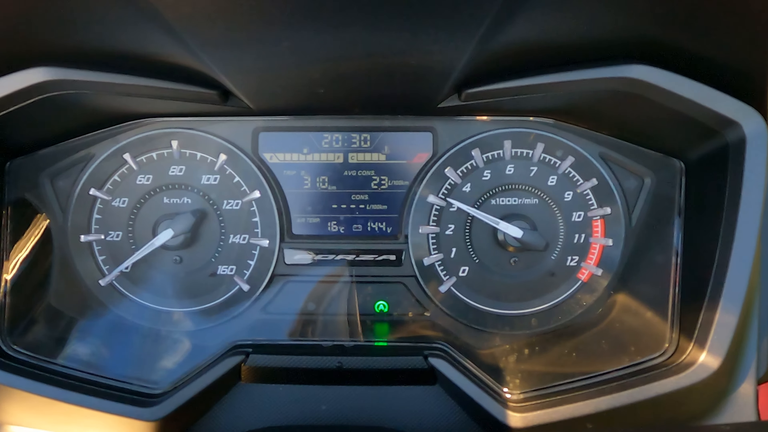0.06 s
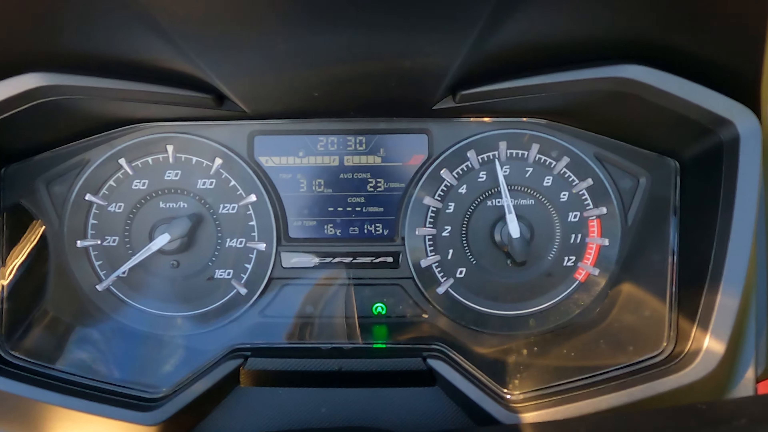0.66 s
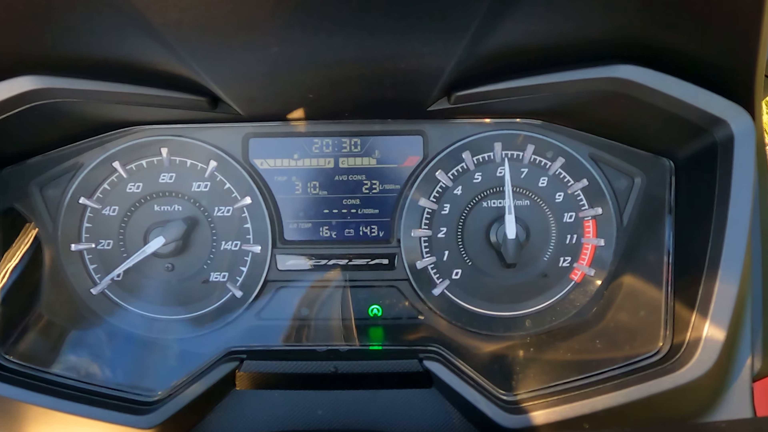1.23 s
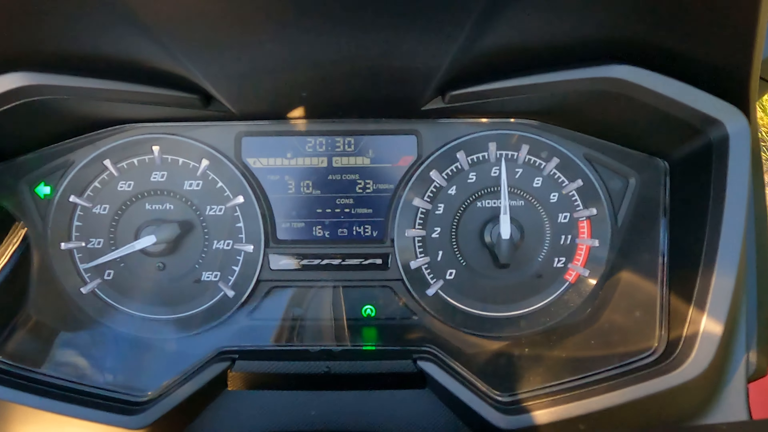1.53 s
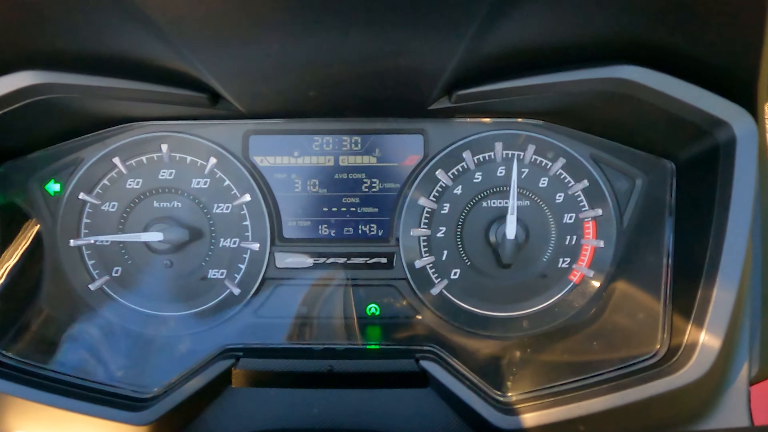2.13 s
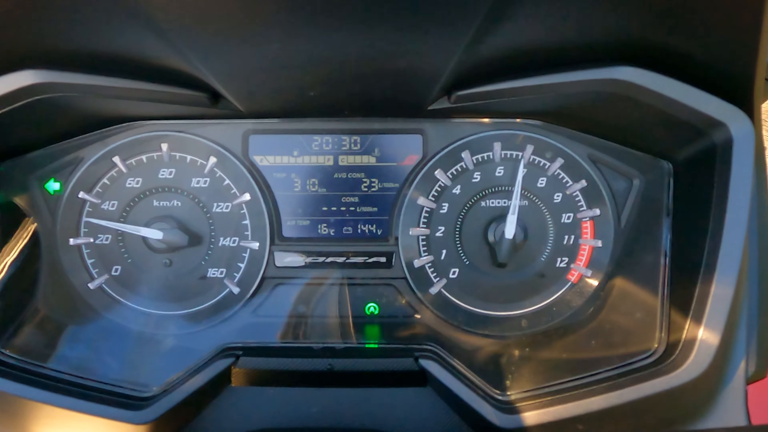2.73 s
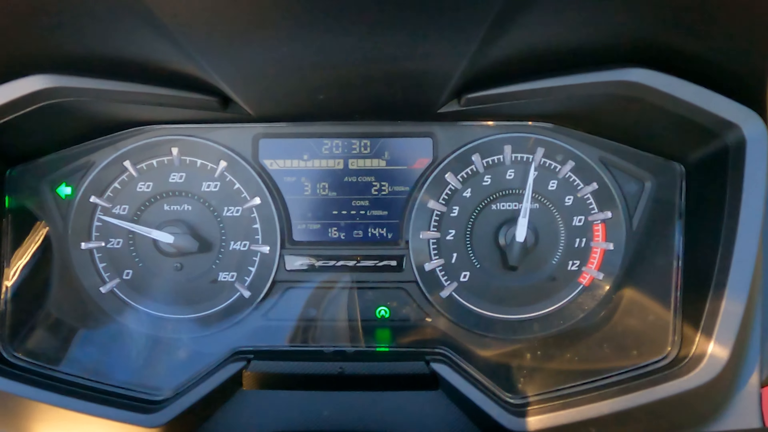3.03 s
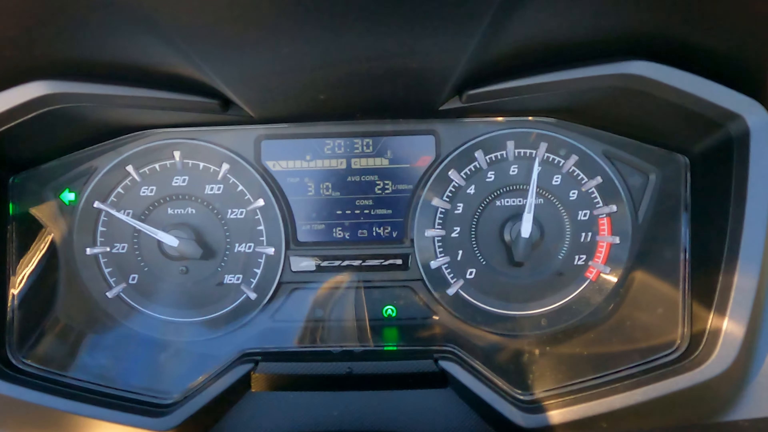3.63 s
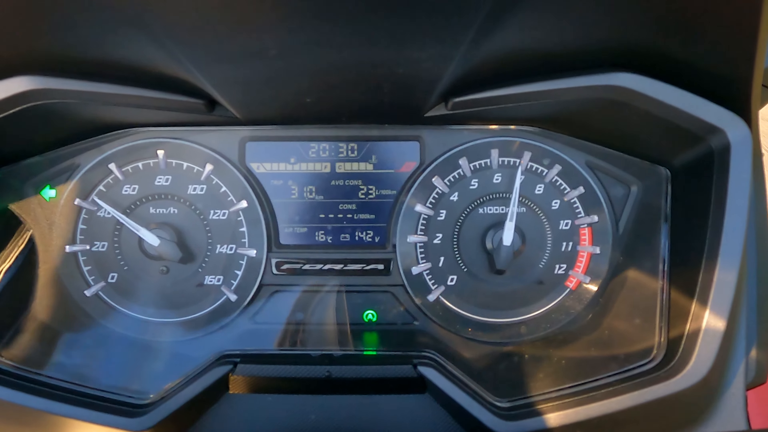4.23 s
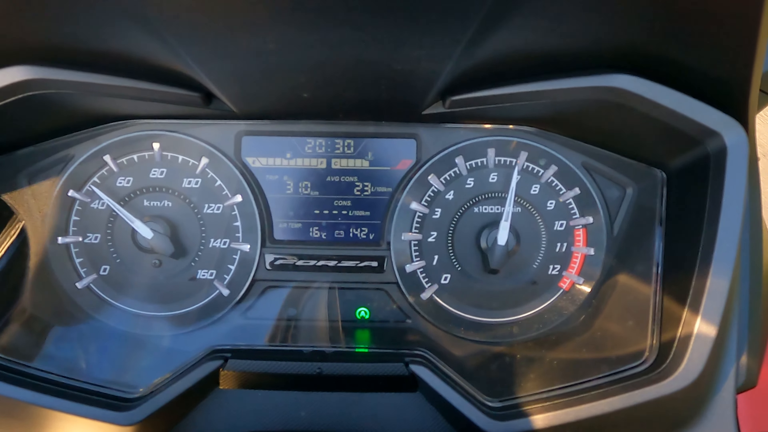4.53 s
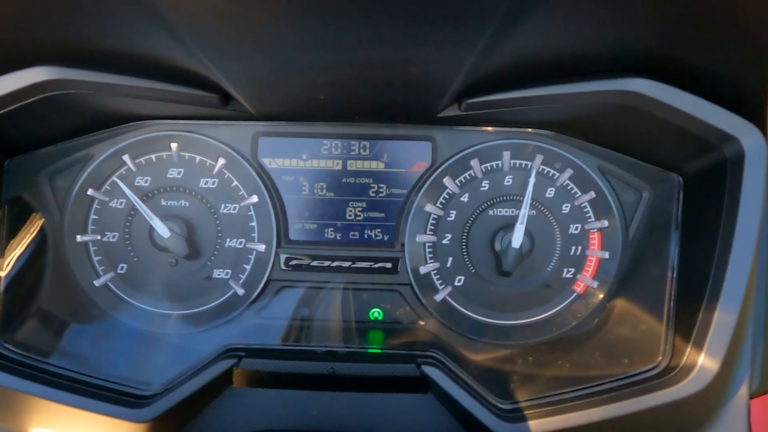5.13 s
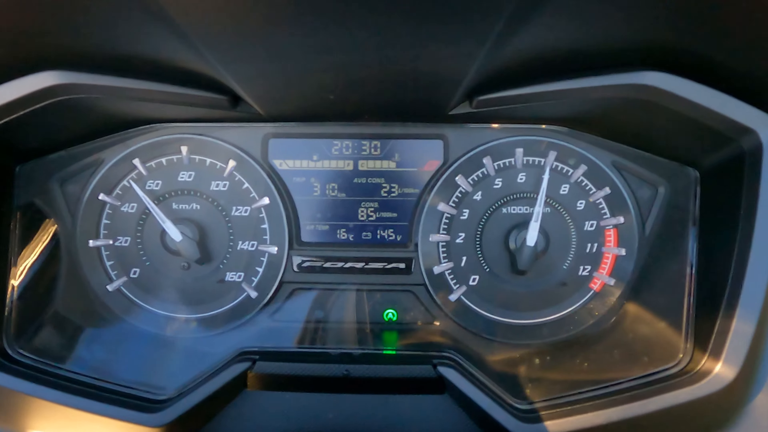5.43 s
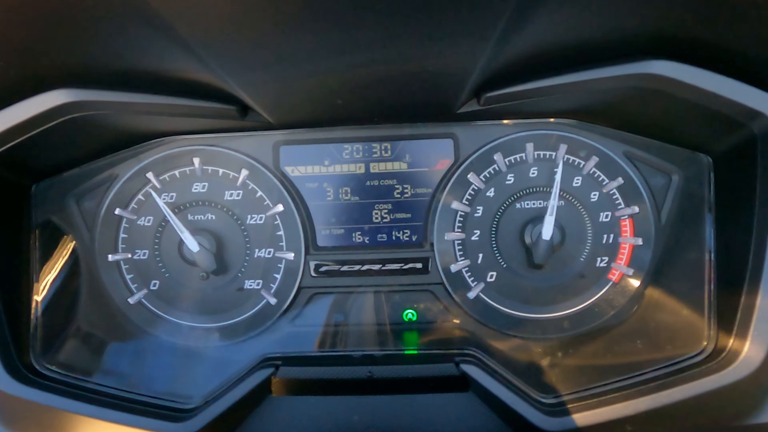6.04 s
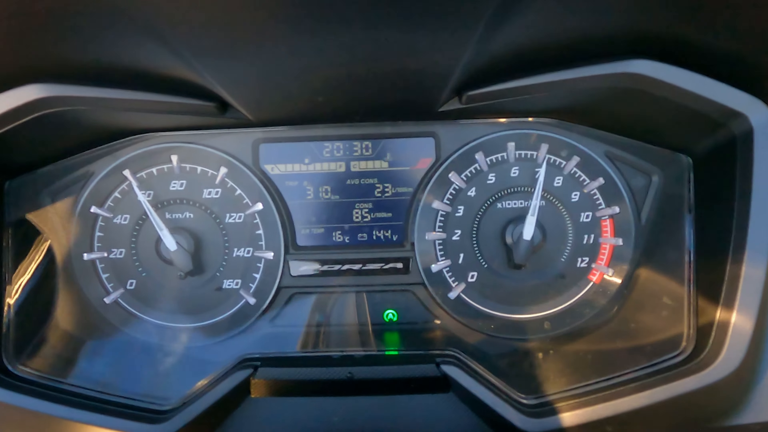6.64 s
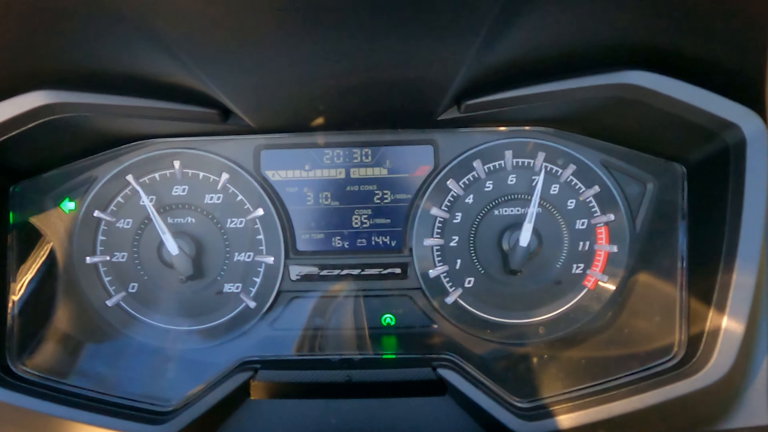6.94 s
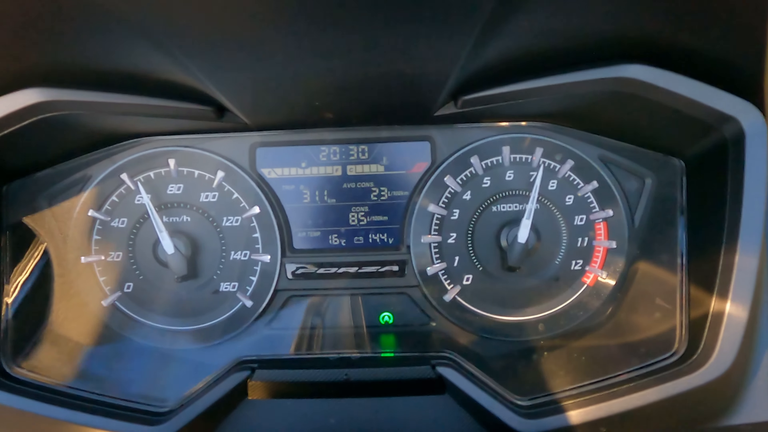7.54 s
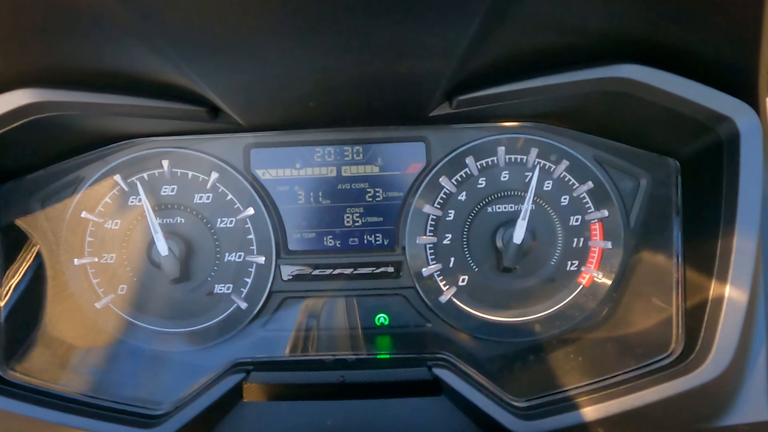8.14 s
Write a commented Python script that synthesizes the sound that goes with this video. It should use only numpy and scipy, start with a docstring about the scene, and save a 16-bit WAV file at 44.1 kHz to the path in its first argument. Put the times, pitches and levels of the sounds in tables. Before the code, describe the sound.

A single-cylinder scooter is heard close up from behind its windscreen. It starts at a low, uneven idle, and at about 0.2 seconds the throttle opens and the revs jump, climbing quickly through the first second. The exhaust booms and the intake hums over mechanical clatter, a light gear whine and a faint hiss. The indicator switch makes two small plastic clicks at about 1.5 and 1.7 seconds. By 2.5 seconds the engine settles into a strong, steady drone that creeps only slightly higher until the end. Tyre noise grows gradually underneath as speed builds. Low wind rumble swells from around 3 seconds, and from 4 seconds irregular gusts buffet the microphone. Short, hard slaps of wind come around 5, from 5.8 to 6.4, near 7 and from 7.8 seconds on. Engine and wind are still going at the end, near 8.4 seconds.

```python
"""A single-cylinder scooter pulls away at full throttle, heard from behind its windscreen.
The revs climb until the variable belt drive holds them. Periodic gas pulses make the exhaust boom
and the intake honk; impacts and meshing teeth drive the casing's resonances into clatter and whine.
The indicator switch clicks in and out. With road speed the tyres roar, and turbulent wind buffets
and slaps the microphone more and more."""
import sys
import numpy as np
from scipy import signal
from scipy.fft import rfft, irfft, next_fast_len
from scipy.io import wavfile
from scipy.ndimage import uniform_filter1d

SR = 44100
rng = np.random.default_rng(int(sys.argv[2]) if len(sys.argv) > 2 else 0)


def int16_out(signal):
    """Quantize to a 16-bit WAV file."""
    q = np.round(np.clip(np.atleast_2d(signal).T, -1, 1) * 32767)
    wavfile.write(sys.argv[1], SR, q.astype(np.int16))


N = 369558
TIME = np.arange(N) / SR


def undb(db):
    """Amplitude ratio of a level in decibels."""
    return 10 ** (np.asarray(db) / 20)


def curves(rows):
    """Linear interpolation of each column after the first (time) to a value per sample."""
    times, *columns = np.transpose(rows)
    return [np.interp(TIME, times, column) for column in columns]


def unit(x):
    """Normalisation to rms 1."""
    return x / np.sqrt(np.mean(x ** 2))


def colour(x, points):
    """Spectral shaping by (Hz, dB) points joined on a logarithmic frequency axis."""
    hz, db = np.transpose(points)
    size = 2 * next_fast_len(len(x) // 2 + 1)
    bins_hz = np.fft.rfftfreq(size, 1 / SR)
    gain = undb(np.interp(np.log(bins_hz + 1), np.log(hz), db, left=-70, right=-70))
    return irfft(rfft(x, size) * gain)[:len(x)]


def noise(points):
    """Spectrally shaped Gaussian noise of rms 1."""
    return unit(colour(rng.standard_normal(N), points))


def walk(rate):
    """Random modulation: values held 1 / rate seconds and smoothed twice; spread near 1."""
    hold = max(int(SR / rate), 2)
    held = np.repeat(rng.standard_normal(N // hold + 1), hold)
    return 1.3 * uniform_filter1d(uniform_filter1d(held, hold), hold)[:N]


def ring(x, hz, width):
    """A second-order resonator with gain 1 at its centre and a bandwidth in Hz."""
    return signal.lfilter(*signal.iirpeak(hz, hz / width, SR), x)


def step(at_s, rise_s):
    """A logistic rise from 0 to 1, halfway at at_s."""
    return (1 + np.tanh((TIME - at_s) / (2 * rise_s))) / 2


def with_revs(hz, held_db, doubling_db, held_hz=57):
    """A power law: the level in dB grows evenly per doubling of the firing rate."""
    return held_db + doubling_db * np.log2(hz / held_hz)


def per_firing(cycle):
    """Cycle-to-cycle variation: one random value per firing, linearly joined."""
    return np.interp(cycle, np.arange(1024), rng.standard_normal(1024))


def gas_pulses(cycle, harmonics, rough):
    """Fourier series of a push then a suck; each burn differs in strength and timing."""
    jittered = cycle + 0.039 * rough * per_firing(cycle)
    wave = sum(-undb(db) * np.sin(2 * np.pi * order * jittered) for order, db in harmonics)
    return np.sqrt(2) * wave * (1 + rough * per_firing(cycle))


def throttle(shut_db=-11.5):
    """Gas flow sets amplitude: the gain of exhaust and intake rises to 1 as the plate opens."""
    shut = undb(shut_db)
    return shut + (1 - shut) * step(at_s=0.16, rise_s=0.06)


def stumble(hz, smooth_hz=49):
    """Uneven combustion adds roughness at low revs."""
    return 0.52 * np.clip((smooth_hz - hz) / 10, 0, 1)


# Exhaust boom and pipe drone. Each row: multiple of the firing rate, relative level in dB.
BOOM_HARMONICS = [(1, -4), (2, 1.5), (3, -8.5)]
DRONE_HARMONICS = [(4, 1), (7, -17), (11, -17.5)]
# Pipe resonances. Each row: frequency of the drone's lowest harmonic in Hz, gain of the drone in dB.
PIPE_RESPONSE = [(140, -35.5), (190, -32.5), (203, -36), (207, -62), (211, -53), (221, -27.5), (226, -27.5),
                 (240, -35.5)]


def exhaust(cycle, hz, lag_cycles=.17):
    """Forced vibration: gas pulses boom, and the pipe drones as the revs sweep its resonances."""
    uneven = stumble(hz)
    boom_db = with_revs(hz, held_db=-23.5, doubling_db=7)
    drone_db = np.interp(DRONE_HARMONICS[0][0] * hz, *np.transpose(PIPE_RESPONSE))
    boom = gas_pulses(cycle, BOOM_HARMONICS, rough=0.015 + uneven / 2)
    drone = gas_pulses(cycle - lag_cycles, DRONE_HARMONICS, rough=0.18 + uneven)
    return undb(boom_db) * boom + undb(drone_db) * drone


# Airbox hum and intake honk. Each row: multiple of the firing rate, relative level in dB.
HUM_HARMONICS = [(5, -1.5), (10, -14.5)]
HONK_HARMONICS = [(6, 3), (7, -7), (8, -10), (9, -11.5), (10, -14.5)]
# Airbox resonances. Each row: frequency of the hum's lowest harmonic in Hz, gain of the hum in dB.
AIRBOX_RESPONSE = [(130, -42), (232, -35.5), (249, -53), (254, -25.5), (260, -25.5), (265, -31.5),
                   (285, -32.5), (300, -64)]
# The honk fades for a while as the revs level off. Each row: time in seconds, gain in dB.
HONK_ENVELOPE = [(0, -35.5), (1.05, -29.5), (1.3, -33), (2.8, -33.5), (3.25, -45.5), (4.1, -44),
                 (4.95, -34.5), (7.2, -32), (8.38, -34.5)]
# The intake tract filters the honk. Each row: frequency in Hz, gain in dB.
INTAKE_TRACT = [(120, -5), (260, 2), (340, -1), (368, -8), (393, 5.5), (450, 6), (520, -4.5), (700, -16)]


def intake(cycle, hz, hum_lag_cycles=.14, honk_lag_cycles=.27, gasp_db=-13):
    """Cavity resonance: pulsed suction makes the airbox hum and the intake tract honk."""
    uneven = stumble(hz)
    hum_gain = undb(np.interp(HUM_HARMONICS[0][0] * hz, *np.transpose(AIRBOX_RESPONSE)))
    honk_gain = undb(curves(HONK_ENVELOPE)[0])
    hum = gas_pulses(cycle - hum_lag_cycles, HUM_HARMONICS, rough=0.17 + uneven)
    honk = gas_pulses(cycle - honk_lag_cycles, HONK_HARMONICS, rough=0.15 + uneven)
    # each gulp of air also rings the airbox with noise
    gulps = (1 + 0.75 * np.cos(2 * np.pi * (cycle - .325))) * rng.standard_normal(N)
    gasp = unit(ring(ring(gulps, hz=290, width=104), hz=235, width=220))
    gasp_gain = undb(gasp_db) * (honk_gain + hum_gain / 2) * (1 + 5 * uneven)
    return hum_gain * hum + honk_gain * colour(honk, INTAKE_TRACT) + gasp_gain * gasp


def knocks(cycle, count, scatter):
    """Periodic impacts: valves, piston and chain strike at fixed crank angles with varying force."""
    hits = np.zeros(N)
    firings = np.arange(int(cycle[-1]))
    for angle in (np.arange(count) + rng.random(count)) / count:
        at = np.searchsorted(cycle, firings + angle)
        hits[at] += rng.choice([-1, 1]) * (1 + scatter * rng.standard_normal(len(at)))
    return hits


def throb(cycle, depth=0.082):
    """Amplitude modulation at the firing rate."""
    return 1 + depth * np.cos(2 * np.pi * cycle)


# Panels that the engine shakes. Each row: resonance in Hz, bandwidth in Hz, gain in dB.
PANEL_MODES = [(606, 121, 12), (937, 150, 1.5), (1268, 200, 2), (1527, 123, -4.5), (1713, 120, 1)]
# Casing noise. Each row: frequency in Hz, relative spectral density in dB.
CASING_SPECTRUM = [(150, 14), (280, -7.5), (420, 4), (560, -2.5), (740, -2.5), (920, 2.5), (1150, -0.5),
                   (1500, -3.5), (1750, -5.5), (1900, -14.5), (2300, -32), (4000, -60)]


def casing_clatter(cycle, knock_db=-5):
    """Impact excitation: knocks ring the panel modes over throbbing casing noise."""
    blows = knocks(cycle, count=16, scatter=0.2)
    panels = sum(undb(db) * ring(ring(blows, hz, width), hz, 2 * width) for hz, width, db in PANEL_MODES)
    return throb(cycle) * noise(CASING_SPECTRUM) + undb(knock_db) * unit(panels)


# Gear and cam chain tones. Each row: multiple of the firing rate, casing resonance in Hz,
# its bandwidth in Hz, relative level at resonance in dB.
MESH_TONES = [(15, 850, 30, -17), (18, 1030, 100, -9), (22, 1246, 40, -17), (27, 1530, 30, -17),
              (29, 1738, 50, -11), (30, 1700, 40, -16), (33, 1730, 70, -11.5), (34, 1700, 160, -13),
              (42, 2510, 30, -22), (48, 2505, 50, -25), (49, 2490, 30, -22), (48, 2869, 50, -23),
              (53, 3005, 60, -31), (65, 3310, 40, -24), (69, 3595, 50, -23)]


def gear_whine(cycle, hz, flutter_db=2.5):
    """Resonance swells each meshing tone as the revs carry it past; backlash makes it flutter."""
    whine = np.zeros(N)
    for order, centre, width, db in MESH_TONES:
        detuning = 2 * (order * hz - centre) / width
        flutter = undb(flutter_db * walk(10)) * (1 + .3 * per_firing(cycle))
        tone = np.sin(2 * np.pi * order * cycle + .3 * walk(14))
        whine += undb(db) * flutter / np.hypot(1, detuning) * tone
    return whine


# Chain rasp and air hiss. Each row: frequency in Hz, relative spectral density in dB.
RASP_SPECTRUM = [(1500, -31), (2100, 1), (2550, 0), (3150, -2), (3370, -4.5), (3650, -1), (4150, -4.5),
                 (4600, -9), (5200, -9), (5900, -10), (6500, -14.5), (8000, -33)]
HISS_SPECTRUM = [(4500, -25), (6800, -3.5), (7700, 0.5), (8500, 0), (10000, -1.5), (12000, -4.5),
                 (15800, -8)]


def rasp_and_hiss(cycle, hz, chain_db=-4, noise_db=-3.5, clutch_db=4.5, sway_db=.5):
    """Broadband noise from dense chain impacts and airflow; both rise as the clutch starts the belt."""
    chain = unit(colour(knocks(cycle, count=70, scatter=0.74), RASP_SPECTRUM))
    rasp = undb(chain_db) * chain + undb(noise_db) * noise(RASP_SPECTRUM)
    rasp *= undb(with_revs(hz, held_db=-49.5, doubling_db=6.5))
    hiss = throb(cycle) * noise(HISS_SPECTRUM)
    hiss *= undb(with_revs(hz, held_db=-55, doubling_db=6.5))
    belt_db = clutch_db * (step(at_s=0.45, rise_s=.06) - 1)
    # moving air between engine and microphone makes the treble sway
    return undb(belt_db + sway_db * walk(20)) * (rasp + hiss)


# Air whistling past the throttle plate. Each row: time in seconds, pitch in Hz, level in dB.
WHISTLE_GLIDE = [(0, 9200, -87), (.125, 10900, -66), (.15, 10200, -61), (.18, 8300, -72), (.8, 8360, -62),
                 (1.3, 8450, -66), (3.7, 8630, -59), (4.4, 8370, -73), (8.38, 8050, -78)]


def throttle_whistle(width_hz=1400):
    """An edge tone: a narrow band of noise that slides as the plate opens."""
    hz, db = curves(WHISTLE_GLIDE)
    phase = 2 * np.pi * np.cumsum(hz) / SR
    return undb(db) * (walk(width_hz) * np.cos(phase) + walk(width_hz) * np.sin(phase))


# Tyre and slipstream roar. Each row: frequency in Hz, relative spectral density in dB.
ROAD_SPECTRUM = [(200, -21), (500, 0), (700, 1.5), (1000, -16), (1600, 1), (2100, -11.5), (4000, -26)]


def tyres(start_db=-62, top_db=-39, rise_s=3.5):
    """Rolling and flow noise grow with road speed, which nears its limit exponentially."""
    speed = 1 - np.exp(-TIME / rise_s)
    return undb(start_db + (top_db - start_db) * speed + walk(7.3)) * noise(ROAD_SPECTRUM)


# Gusts. Each row: centre in seconds, length in seconds, change of rumble in dB, swell of eddies in dB.
GUSTS = [(3.22, 0.069, 7, 5), (3.7, 0.27, 4.5, 0.5), (4.277, 0.14, 4.5, 5), (4.45, 0.12, 5, 3),
         (4.887, 0.25, 4.5, 4.5), (5.2, 0.11, 2, 7), (5.537, 0.41, 1.5, 5.5), (5.8, 0.088, -7, 2),
         (5.926, .12, 1.5, 8), (6.12, .1, 0, 2.5), (6.337, 0.31, 2.5, 4.5), (6.56, 0.083, 2.5, 4.5),
         (6.71, 0.073, 8, 4.5), (6.906, 0.082, 1.5, 6), (7.32, 0.1, 2.5, 6), (7.512, 0.046, 2, 8),
         (7.71, 0.091, -1, 5.5), (7.9, 0.1, -4.5, 7), (8.241, 0.069, -9, 12), (8.38, 0.09, 6, 11.5)]


def wind_levels(start_s=1.11, pull_s=3.9, breeze=0.033, spill_db=6):
    """Flow noise follows a power law of air speed: rumble and eddy gains in dB, varied by gusts."""
    road_speed = 1 - np.exp(-np.maximum(TIME - start_s, 0) / pull_s)  # share of top speed
    doublings = np.log2(breeze + road_speed)
    rumble_db = -18.5 + 6.5 * doublings
    eddy_db = -27.5 + 3.5 * doublings
    eddy_db += spill_db * step(at_s=3.98, rise_s=.06)  # the airstream spills over the windscreen
    for centre, length, low_db, swirl_db in GUSTS:
        swell = np.exp(-2 * ((TIME - centre) / length) ** 2)
        rumble_db += low_db * swell
        eddy_db += swirl_db * swell
    return rumble_db, eddy_db


# Wind rumble and buffeting. Each row: frequency in Hz, relative spectral density in dB.
RUMBLE_SPECTRUM = [(10, -28), (22, -24), (35, -3.5), (65, -10), (100, -14), (140, -15), (250, -65)]
BUFFET_SPECTRUM = [(60, 6), (120, -1), (180, 0), (280, 1), (360, -6.5), (460, -9.5), (600, -24.5),
                   (900, -34), (2000, -78)]


def wind(buffet_db=1.5, flutter_db=5, tear_db=-21):
    """Turbulence at the microphone: slow pressure swings and fast eddies; the strongest tear brightly."""
    rumble_db, eddy_db = wind_levels()
    eddy = unit(undb(flutter_db * np.tanh(walk(120))))
    tear = unit(eddy ** 2) * noise([(250, -35), (450, 2.0), (680, 4), (1000, -5.5), (2500, -23)])
    buffeting = undb(buffet_db) * eddy * noise(BUFFET_SPECTRUM) + undb(tear_db) * tear
    return undb(rumble_db) * noise(RUMBLE_SPECTRUM) + undb(eddy_db) * buffeting


# Snaps of the switch. Each row: start in seconds, level in dB.
SWITCH_SNAPS = [(1.491, -42), (1.694, -34), (1.698, -38)]
# Timbre of the plastic. Each row: frequency in Hz, relative spectral density in dB.
SNAP_SPECTRUM = [(2500, -25), (4100, 6), (5500, -6), (7500, -3), (9200, 1), (12500, 0), (16000, -4)]


def indicator_switch(decay_s=.003):
    """Damped transients: plastic snaps as the thumb pushes the switch and lets it spring back."""
    envelope = np.zeros(N)
    for start, db in SWITCH_SNAPS:
        envelope += undb(db) * (TIME >= start) * np.exp(-np.abs(TIME - start) / decay_s)
    return envelope * noise(SNAP_SPECTRUM)


# Hard slaps of wind. Each row: time in seconds, relative peak level in dB, centre frequency in Hz.
WIND_SLAPS = [(4.191, -17, 500), (4.41, -15, 375), (4.881, -12, 372), (5.582, -24, 444), (5.788, -12, 400),
              (5.932, -10, 382), (5.962, -6, 447), (5.999, -15, 441), (6.144, -11.5, 503),
              (6.236, -16, 400), (6.308, -30, 377), (6.378, -10, 410), (6.389, -3.5, 440), (6.893, -9, 382),
              (7.509, -14, 450), (7.792, -15, 376), (7.837, -6, 380), (7.863, -9, 443), (7.9, -13, 380),
              (8.245, -14, 398), (8.343, -6, 388)]


def wind_slaps(width_cycles=0.43, gain_db=0.5):
    """A vortex crossing the microphone port makes a wave packet of one or two pressure swings."""
    pressure = np.zeros(N)
    for (at_s, db, hz), phase in zip(WIND_SLAPS, rng.random(len(WIND_SLAPS))):
        near = slice(int((at_s - .02) * SR), int((at_s + .02) * SR))
        cycles = (TIME[near] - at_s - .002) * hz
        envelope = undb(db + gain_db) * np.exp(-(cycles / width_cycles) ** 2 / 2)
        pressure[near] += envelope * np.cos(2 * np.pi * (cycles + phase))
    return pressure


# Engine speed, at two crank turns per firing. Each row: time in seconds, firing rate in Hz.
FIRING_RATE = [(0, 25.5), (.13, 26.3), (.28, 38), (.4, 43.3), (.53, 46.8), (.75, 49.4), (1, 50.8),
               (1.4, 52.1), (2, 52.7), (2.25, 55.2), (2.5, 56.6), (3.5, 56.6), (4.2, 56.3), (4.75, 56.9),
               (6.25, 58.4), (6.8, 59.3), (7.3, 59.4), (8.38, 60.2)]


def scene():
    """Superposition at one microphone; pipes and machinery share the phase of the firing cycle."""
    hz, = curves(FIRING_RATE)
    cycle = np.cumsum(hz * (1 + .0008 * walk(20))) / SR
    pipes = throttle() * (exhaust(cycle, hz) + intake(cycle, hz))
    casing_db = with_revs(hz, held_db=-35.5, doubling_db=3)
    casing = undb(casing_db) * (casing_clatter(cycle) + gear_whine(cycle, hz))
    engine = pipes + casing + rasp_and_hiss(cycle, hz) + throttle_whistle()
    return (engine + tyres() + wind() + wind_slaps() + indicator_switch())[None]


def record(dry, top_hz=15850):
    """Soft saturation rounds the highest peaks, and a steep low-pass filter cuts the top."""
    rounded = dry / (1 + dry ** 6) ** (1 / 6)
    return signal.sosfilt(signal.ellip(10, .1, 80, top_hz, fs=SR, output="sos"), rounded)


dry = scene()
out = record(dry)
int16_out(out)
```